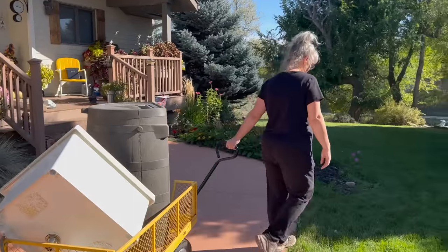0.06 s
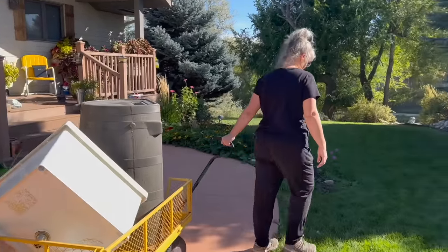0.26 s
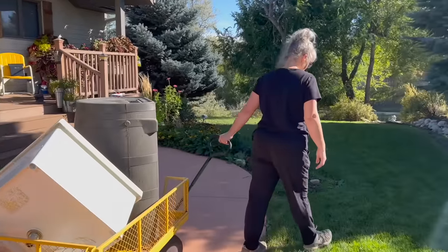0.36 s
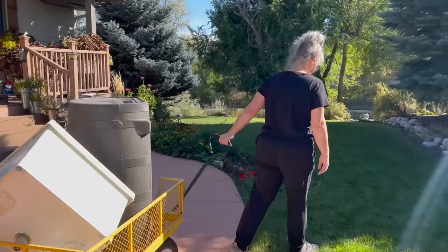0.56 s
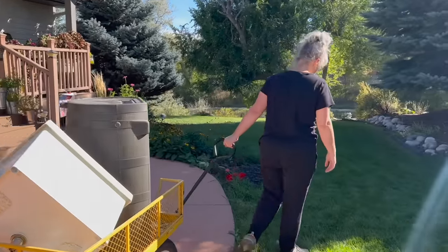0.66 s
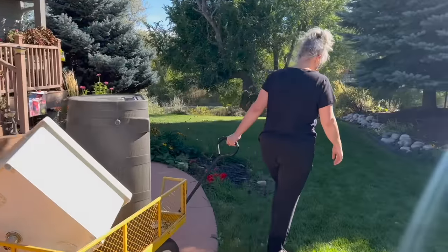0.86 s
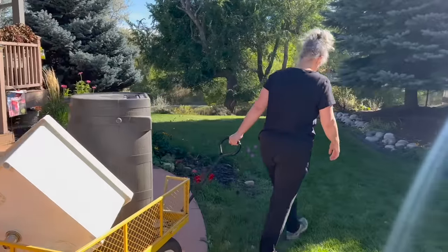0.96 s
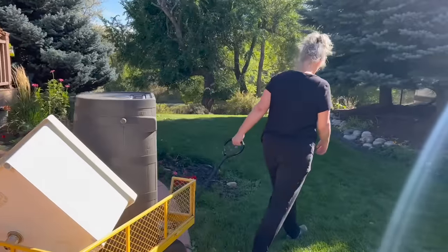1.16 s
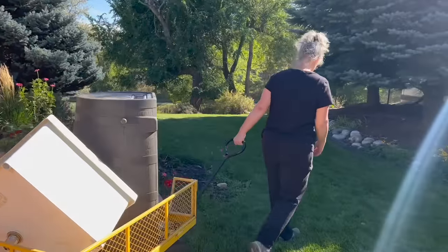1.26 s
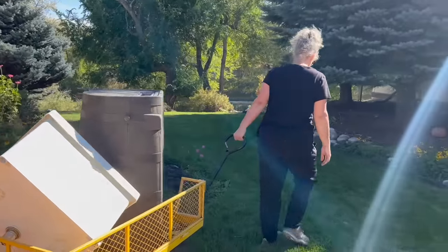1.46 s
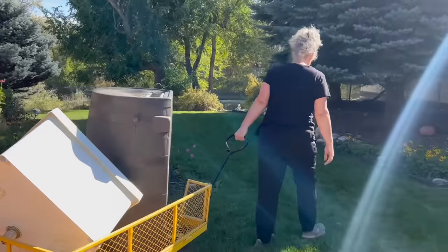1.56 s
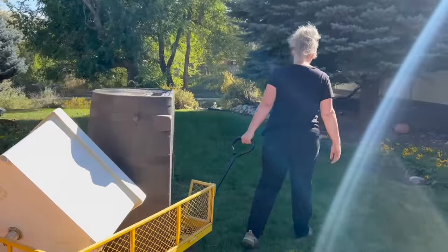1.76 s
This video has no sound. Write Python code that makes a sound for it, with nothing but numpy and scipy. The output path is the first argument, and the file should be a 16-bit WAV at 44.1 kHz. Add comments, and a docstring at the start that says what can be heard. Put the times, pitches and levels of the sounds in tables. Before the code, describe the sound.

A loaded steel-mesh garden wagon rolls off a hard path onto grass, booming, rumbling and rattling

```python
"""The hollow load of a steel-mesh garden wagon, a plastic barrel and a big box, booms at each bump as the
wagon is pulled off a concrete path onto a lawn: short swelling sines of sagging pitch, with rough bass noise.
The loose mesh sides clink, the handle chatters, latch pins jingle and once the whole bed clatters: bursts of
contacts ring the modes and dense noise of each steel part.
Under it the wheels rumble, drone and crunch, and shoes and tyres scuff the ground: shaped noise and grains."""
import sys
import numpy as np
from scipy import signal
from scipy.fft import rfft, irfft
from scipy.io import wavfile
from scipy.ndimage import uniform_filter1d

SR = 44100
rng = np.random.default_rng(int(sys.argv[2]) if len(sys.argv) > 2 else 0)


def digitize_waveform(pressure):
    """Quantize a signal to 16-bit integers and store it at the path in sys.argv[1].

    Rows of a 2-D input are taken as channels; values are limited to [-1, 1].
    """
    field = np.atleast_2d(pressure).T
    bounded = np.clip(field, -1, 1)
    quanta = np.round(bounded * 32767).astype(np.int16)
    wavfile.write(sys.argv[1], SR, quanta)


N = 79380
EVENT_S = 0.4  # length of each boom, blow and scuff
EVENT_T = np.arange(int(EVENT_S * SR)) / SR

# bass spectrum of the wheel rumble and of the roughness in the booms: (frequency [Hz], level [dB])
RUMBLE_SPECTRUM = [(20, -30), (64, -0.5), (170, -12.5), (250, -24.5), (1000, -77)]


def undb(db):
    """Decibels to amplitude gain."""
    return 10 ** (np.asarray(db) / 20)


def unit(x):
    """Scale to rms 1."""
    return x / np.sqrt(np.mean(x ** 2))


def pan(left_minus_right_db):
    """Left and right gains for a level difference."""
    return undb(np.array([[left_minus_right_db], [-left_minus_right_db]]) / 2)


def curve(rows, axis=1):
    """Gain over time from one dB column of a table, interpolated in dB."""
    rows = np.array(rows)
    return undb(np.interp(np.arange(N) / SR, rows[:, 0], rows[:, axis]))


def colour(x, rows, axis=1):
    """Zero-phase filter through (Hz, dB) points, interpolated over log frequency."""
    rows = np.array(rows)
    size = x.shape[-1]
    hz = np.maximum(np.fft.rfftfreq(size, 1 / SR), 1)
    gain_db = np.interp(np.log(hz), np.log(rows[:, 0]), rows[:, axis])
    return irfft(rfft(x) * undb(gain_db), size)


def noise(rows, size=N):
    """Coloured noise of rms 1, an independent stream for each port."""
    return unit(colour(rng.standard_normal((2, size)), rows))


def swell(t, rise_ms):
    """Envelope that rises to 1 in the given time and dies away."""
    u = t * 1000 / rise_ms
    return u * np.exp(1 - u)


def add(out, start_s, sound):
    """Mix a sound in at a time, cut at the end of the scene."""
    i = max(int(start_s * SR), 0)
    out[:, i:i + sound.shape[-1]] += sound[:, :max(N - i, 0)]


def load():
    """Barrel and box boom for a few cycles per bump, pitch sagging; one port leads in phase."""
    # bumps: (time [s], centre pitch [Hz], peak level [dB], swell time [ms])
    booms = [(0.2, 147, -21, 5.9), (0.25, 178, -28.5, 7.8), (0.275, 66.6, -27.5, 6.9),
             (0.382, 193, -33, 2.4), (.384, 86.6, -16, 7.1), (.419, 175.2, -26, 10), (0.437, 88, -21, 8.8),
             (0.457, 125, -22.5, 6.1), (.482, 91, -24.5, 5), (0.509, 173, -27.5, 5.3),
             (0.525, 71.4, -25, 7.2), (0.543, 140, -17.5, 3.13), (0.656, 112, -37, 10.5),
             (1.004, 115, -24.5, 2.3), (1.01, 71, -33.5, 10.8), (1.258, 78.3, -40, 18.3)]
    sag, sag_s = 0.13, 0.015  # pitch falls from +13 % to -13 % of centre
    roughness, lead_rad = 0.17, 0.73
    out = np.zeros((2, N))
    for start_s, centre_hz, db, rise_ms in booms:
        pitch_hz = centre_hz * (1 + sag * (2 * np.exp(-EVENT_T / sag_s) - 1))
        phase = 2 * np.pi * np.cumsum(pitch_hz) / SR
        lead = lead_rad * rng.choice([-1, 1]) * np.array([[1], [-1]])
        body = np.sin(phase + lead) + roughness * noise(RUMBLE_SPECTRUM, len(EVENT_T))
        add(out, start_s, undb(db) * swell(EVENT_T, rise_ms) * body)
    return out


def fade(t60_s, hold_s=0):
    """Exponential decay by 60 dB in t60, after a hold."""
    return np.exp(-np.log(1000) * np.maximum(EVENT_T - hold_s, 0) / t60_s)


def tilted(x, db_per_octave):
    """Tilt the spectrum between 500 Hz and 16 kHz, pivoting at 4 kHz."""
    return colour(x, [(500, -3 * db_per_octave), (16000, 2 * db_per_octave)])


def ringing(modes, contact_s):
    """Decaying sines at slightly shifting mode frequencies; each blow favours other modes."""
    detune, strike_spread_db, rise_s = 0.0018, 4, 0.0056
    ring = np.zeros((2, len(EVENT_T)))
    for mode_hz, mode_db, t60_s in modes:
        gain = undb(mode_db + strike_spread_db * rng.standard_normal())
        hz = mode_hz * (1 + detune * rng.standard_normal())
        port_phase = np.pi / 2 * rng.random((2, 1))
        wave = np.sin(2 * np.pi * (hz * EVENT_T + rng.random()) + port_phase)
        ring += gain * fade(t60_s, contact_s / 2) * wave
    return ring * np.minimum(EVENT_T / rise_s, 1)


def contact_burst(contact_s):
    """Random contacts of random strength, fading out after a first full one."""
    contacts_per_s = 640
    size = len(EVENT_T)
    hits = rng.random(size) < contacts_per_s / SR
    contacts = rng.random(size) * hits * np.exp(-(EVENT_T / contact_s) ** 2)
    contacts[0] = 1
    return contacts


def renewed(decay, contacts):
    """Envelope of a decay restarted by every contact, their energies adding."""
    energy = signal.fftconvolve(decay ** 2, contacts ** 2)[:len(EVENT_T)]
    return np.sqrt(np.abs(energy))


def rattle(events, modes, spectrum, noise_db, noise_t60_s):
    """Each blow is a burst of contacts on a steel part: modes, dense noise and a bright crack."""
    tail_db, tail_t60_s = -31, 0.071  # faint second decay of the dense noise
    crack_db, crack_t60_s = -8.5, 0.013
    out = np.zeros((2, N))
    size = len(EVENT_T)
    for start_s, db, contact_ms, tilt in events:
        contact_s = contact_ms / 1000
        ring = ringing(modes, contact_s)
        contacts = contact_burst(contact_s)
        dense_decay = fade(noise_t60_s) + undb(tail_db) * fade(tail_t60_s)
        dense = noise(spectrum, size) * renewed(dense_decay, contacts)
        crack = rng.standard_normal((2, size)) * renewed(fade(crack_t60_s), contacts)
        blow = unit(ring) + undb(noise_db) * unit(dense) + undb(crack_db) * unit(crack)
        end_fade = np.minimum(1, 10 * (1 - EVENT_T / EVENT_S))
        blow = tilted(blow, tilt) * end_fade
        # the level refers to the loudest 10 ms
        loudest = uniform_filter1d(np.mean(blow ** 2, axis=0), size=441).max()
        add(out, start_s, blow * undb(db) / np.sqrt(loudest))
    return out


def mesh_sides():
    """Loose mesh sides clink: a few modes amid dense wire rattle."""
    # clinks: (time [s], level before panning [dB], contact time [ms], treble tilt [dB per octave])
    clinks = [(.335, -39.5, 9.6, 1), (.411, -44, 4.5, 1), (.526, -47.5, 2.8, -4), (.637, -46.5, 8.5, -1.5),
              (.782, -50.5, 13, -1.5), (1.076, -49, 18, 0), (1.198, -42, 5.9, 2), (1.228, -52, 17, -2.5)]
    # modes: (frequency [Hz], level [dB], t60 [s])
    modes = [(2310, 4, 0.044), (2501, -2, 0.1), (3650, 6, 0.05), (3870, -2, 0.08), (4190, -3, .12),
             (4870, -7.5, 0.21), (5300, -5, 0.07)]
    # wire rattle spectrum: (frequency [Hz], level [dB per Hz])
    wires = [(300, -17), (1700, -4.5), (2350, 2.5), (3250, -3.5), (3950, 2), (4600, -2), (5400, -8),
             (6100, -11), (8200, -8.5), (15500, -20.5)]
    return rattle(clinks, modes, wires, noise_db=3.5, noise_t60_s=0.15) * pan(3)


def bed():
    """The whole bed clatters: low and middle modes in dense sheet noise."""
    # blows: (time [s], level before panning [dB], contact time [ms], treble tilt [dB per octave])
    clatters = [(1.504, -34, 15, -1.5), (1.52, -37, 9.9, -2.5), (1.546, -41, 9, -3.5),
                (1.566, -48.5, 5.2, -12)]
    # modes: (frequency [Hz], level [dB], t60 [s])
    modes = [(416, -0.5, 0.12), (488.5, -1.5, 0.11), (769, -2, 0.1), (1176, 2.5, 0.11), (2290, -2, 0.089),
             (2573, -3, 0.074), (4150, 5, 0.05)]
    # sheet noise spectrum: (frequency [Hz], level [dB per Hz])
    sheet = [(150, 0), (450, 5.5), (800, 1.5), (1500, 1), (2500, 3.5), (4200, -1), (4700, -3), (15500, -11)]
    return rattle(clatters, modes, sheet, noise_db=6.5, noise_t60_s=0.085) * pan(2.5)


def handle():
    """The handle chatters in its pivot: three modes under a strong rasp."""
    # chatters: (time [s], level [dB], contact time [ms], treble tilt [dB per octave])
    chatters = [(1.085, -55, 29, -2), (1.362, -51.5, 22, 6), (1.712, -48, 9.8, -5), (1.757, -49, 8, -2)]
    # modes: (frequency [Hz], level [dB], t60 [s])
    modes = [(2825, -5, .07), (3530, 2, 0.066), (5280, -2, .16)]
    # pivot rasp spectrum: (frequency [Hz], level [dB per Hz])
    pivot = [(1600, -15), (2900, 5), (4200, -6.5), (15500, -24.5)]
    return rattle(chatters, modes, pivot, noise_db=13.5, noise_t60_s=0.12)


def latch_pins():
    """Small latch pins jingle: high modes with bright contact noise."""
    # jingles: (time [s], level [dB], contact time [ms], treble tilt [dB per octave])
    jingles = [(1.461, -45.5, 3.8, -8.5), (1.478, -52, 4.6, 2), (1.544, -41.5, 2.6, 0.5),
               (1.731, -48.5, 3, 7), (1.743, -53, 2.8, -7), (1.776, -46.5, 3, 19)]
    # modes: (frequency [Hz], level [dB], t60 [s])
    modes = [(7850, 1, 0.055), (8040, 1, 0.061), (13200, -1, 0.061)]
    # contact noise spectrum: (frequency [Hz], level [dB per Hz])
    tick = [(1500, -30), (7000, 7), (15500, -5)]
    return rattle(jingles, modes, tick, noise_db=3.5, noise_t60_s=0.043)


def flicker():
    """Quick random wavering of level, as the ground under the tyres changes."""
    steps_per_s, rms_db = 35, 1.7
    hold = max(int(SR / steps_per_s), 1)
    steps = np.repeat(rng.standard_normal(N // 100), hold)[:N]
    return undb(rms_db * unit(uniform_filter1d(steps, hold)))


def crunch(spectrum):
    """Grit and grass crushed in tiny grains, over a hiss of the same colour."""
    grains_per_s, spread_db, hiss_db = 3200, 1.5, -0.5
    hits = rng.random(N) < grains_per_s / SR
    strength = undb(spread_db * np.minimum(rng.exponential(size=N), 4))
    grains = hits * strength * rng.standard_normal((2, N))
    return unit(unit(colour(grains, spectrum)) + undb(hiss_db) * noise(spectrum))


def wheels():
    """Tyres rumble, make the bed drone and crunch the ground; drone and crunch flicker."""
    # rumble level: (time [s], level [dB])
    rumble_level = [(0, -42), (.24, -40.5), (.33, -45), (.38, -33), (.59, -35.5), (.63, -42.5),
                    (.73, -38.5), (.79, -53.5), (.91, -48.5), (1.15, -58), (1.53, -55.5), (1.62, -47),
                    (1.8, -46.5)]
    # rolling levels before flicker: (time [s], drone level [dB], crunch level [dB])
    rolling_level = [(0, -55.5, -64.5), (.3, -51, -62), (.48, -49, -59), (.6, -55, -61.5), (.68, -51, -55),
                     (.88, -54, -64.5), (1.02, -47, -51), (1.18, -51.5, -59.5), (1.25, -47.5, -52.5),
                     (1.34, -49, -58), (1.63, -44.5, -51.5), (1.69, -47.5, -59.5), (1.8, -46, -53)]
    # drone spectrum: (frequency [Hz], level [dB])
    drone_spectrum = [(100, -14), (340, 0), (650, -10.5), (1000, -10.5), (1500, -20.5), (8000, -44.5)]
    # crunch spectrum: (frequency [Hz], level [dB])
    crunch_spectrum = [(600, -16), (1500, -5), (2450, 3), (3200, -4), (4200, -4), (6000, -8.5), (8000, -9),
                       (10000, -21.5), (12000, -9.5), (15500, -11.5)]
    rumble = noise(RUMBLE_SPECTRUM) * curve(rumble_level)
    drone = noise(drone_spectrum) * curve(rolling_level)
    crushing = crunch(crunch_spectrum) * curve(rolling_level, axis=2)
    return rumble + (drone + crushing) * flicker()


def scuffs():
    """Shoes and tyres scrape the ground: short dull swells of noise."""
    # scrapes: (time [s], level [dB], swell time [ms])
    scrapes = [(.338, -47, 9.2), (0.366, -41.5, 2.9), (0.481, -53, 9.7), (0.762, -44.5, 14.8),
               (0.906, -51.5, 3.4), (0.951, -44, 6.2)]
    # scrape spectrum: (frequency [Hz], level [dB per Hz])
    spectrum = [(150, -23), (400, 7.5), (950, 1), (1600, -6), (15000, -22.5)]
    out = np.zeros((2, N))
    for start_s, db, rise_ms in scrapes:
        add(out, start_s, undb(db) * swell(EVENT_T, rise_ms) * noise(spectrum, len(EVENT_T)))
    return out


def scene():
    """Sum of load, loose steel, wheels and scuffs."""
    steel = mesh_sides() + bed() + handle() + latch_pins()
    return load() + steel + wheels() + scuffs()


def record(dry):
    """Two microphone ports hear bass alike and oppose in a narrow treble band; the top is cut."""
    # port response: (frequency [Hz], gain of the sum [dB], gain of the difference [dB])
    ports = [(158, 1, -14.5), (1070, -3, -3), (4240, -1.5, -3), (8970, -1.5, -5), (10100, -31.5, 11),
             (10100, -29, -7), (11260, -3, -0.5), (15500, -5.5, -24)]
    top_hz = 15700
    mid = colour((dry[0] + dry[1]) / np.sqrt(2), ports, axis=1)
    side = colour((dry[0] - dry[1]) / np.sqrt(2), ports, axis=2)
    # order 10, 0.2 dB ripple, 80 dB stopband
    low_pass = signal.ellip(10, 0.2, 80, top_hz, fs=SR, output="sos")
    return signal.sosfilt(low_pass, np.array([mid + side, mid - side]))


dry = scene()
out = record(dry)
digitize_waveform(out)
```